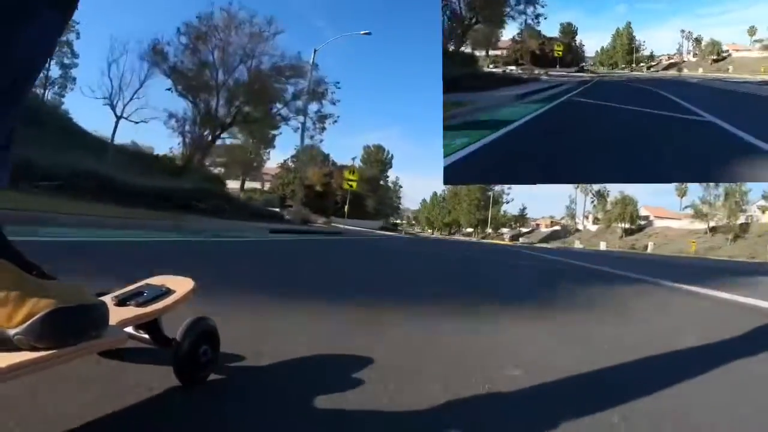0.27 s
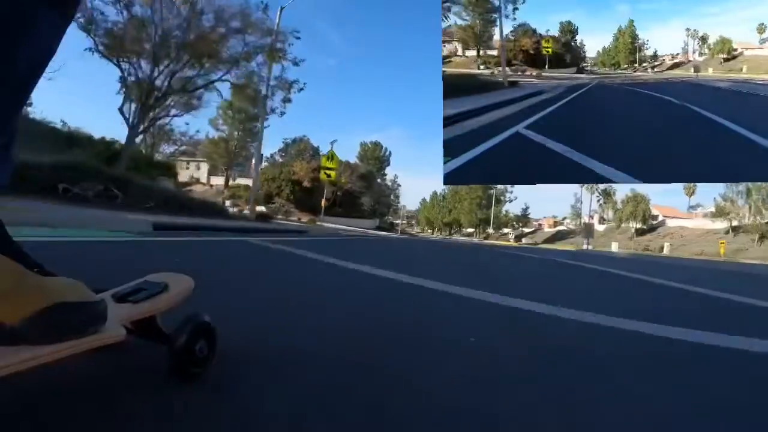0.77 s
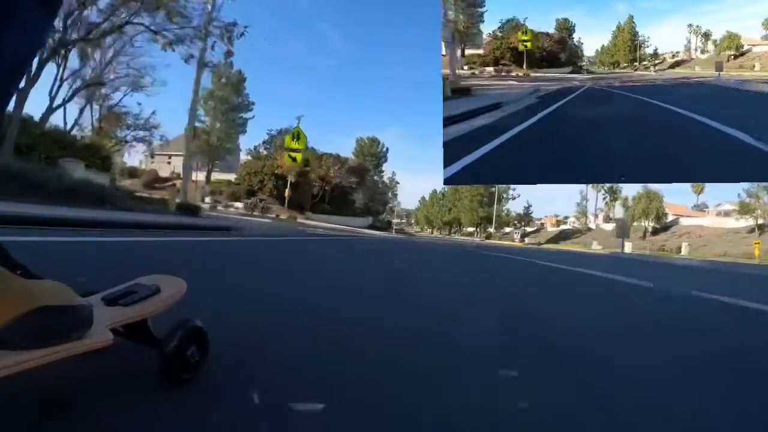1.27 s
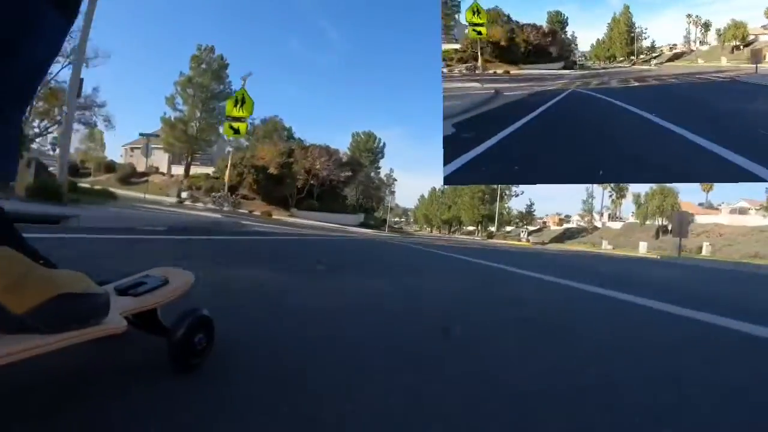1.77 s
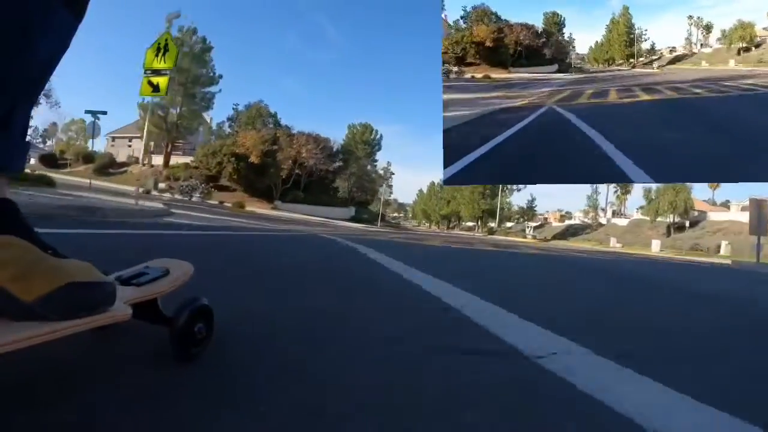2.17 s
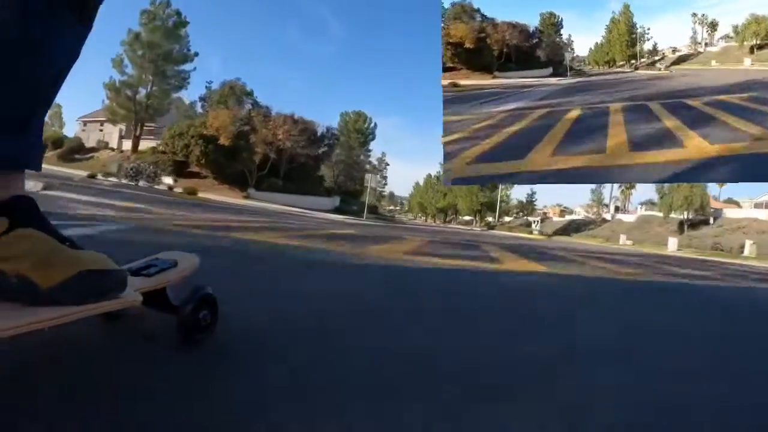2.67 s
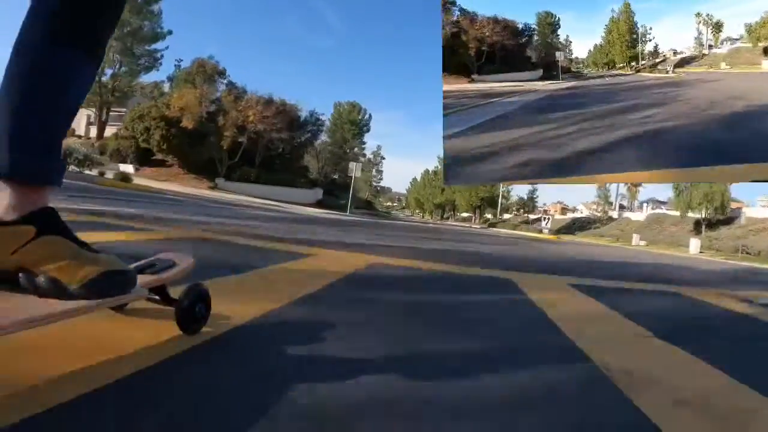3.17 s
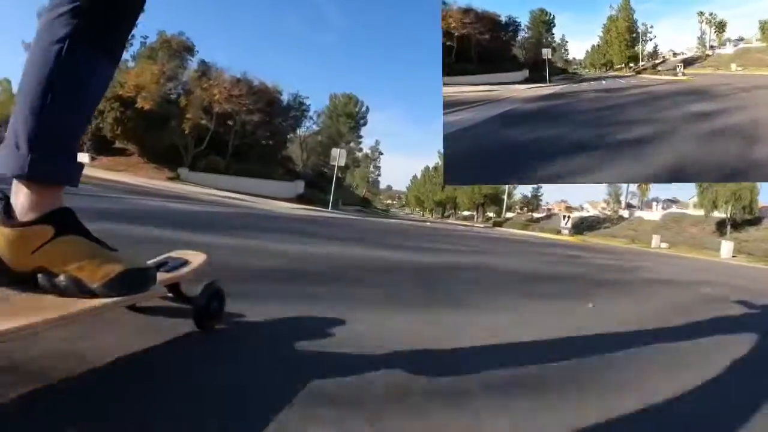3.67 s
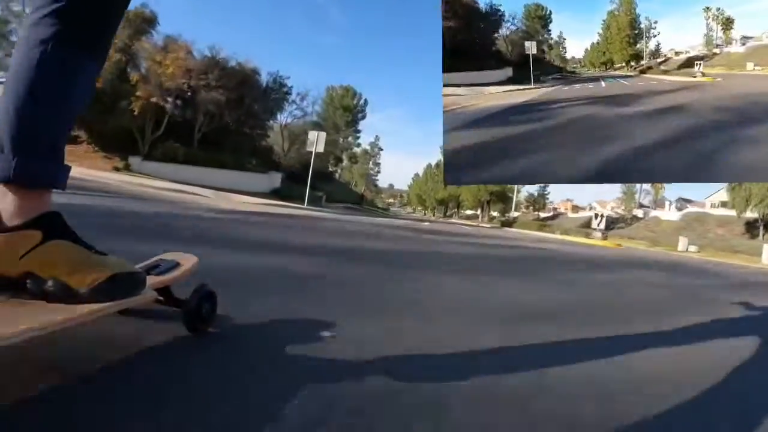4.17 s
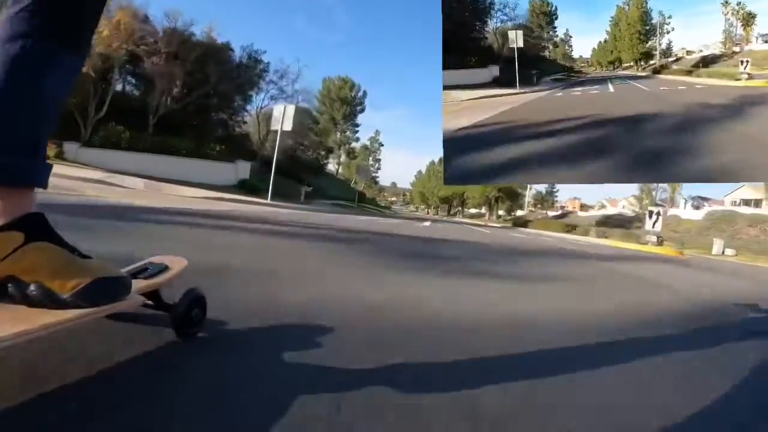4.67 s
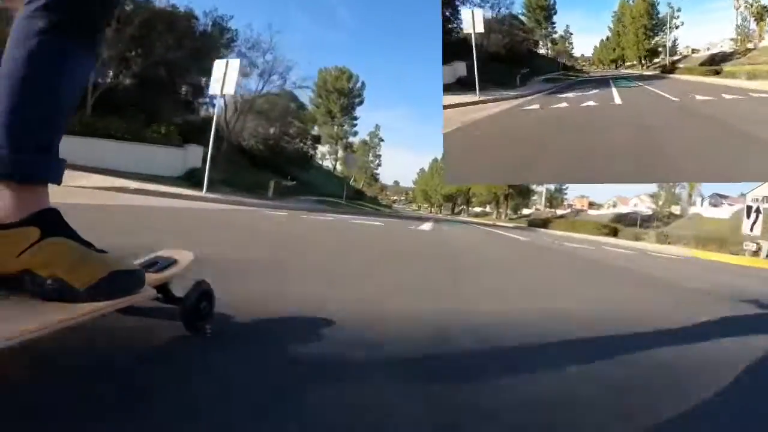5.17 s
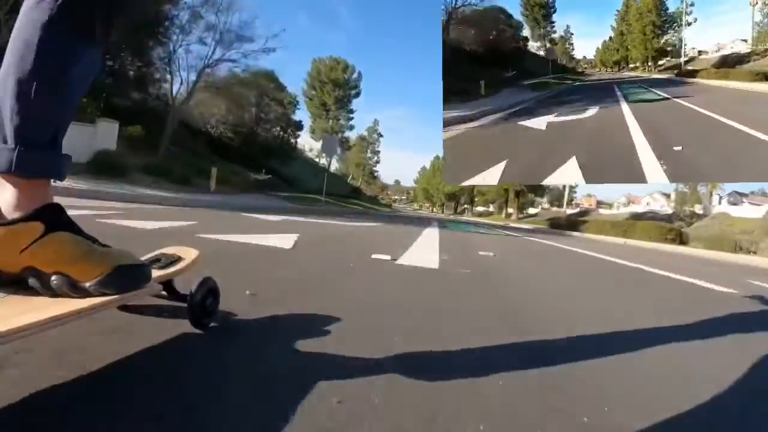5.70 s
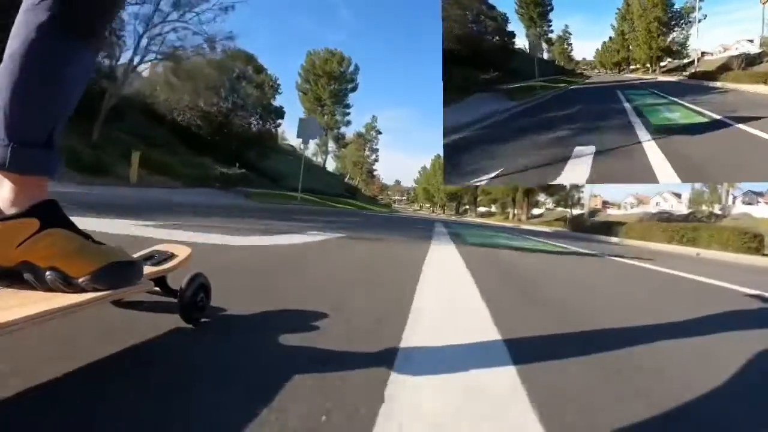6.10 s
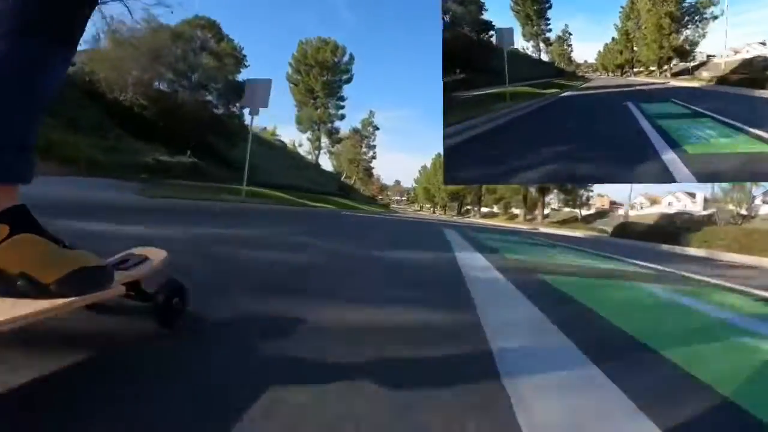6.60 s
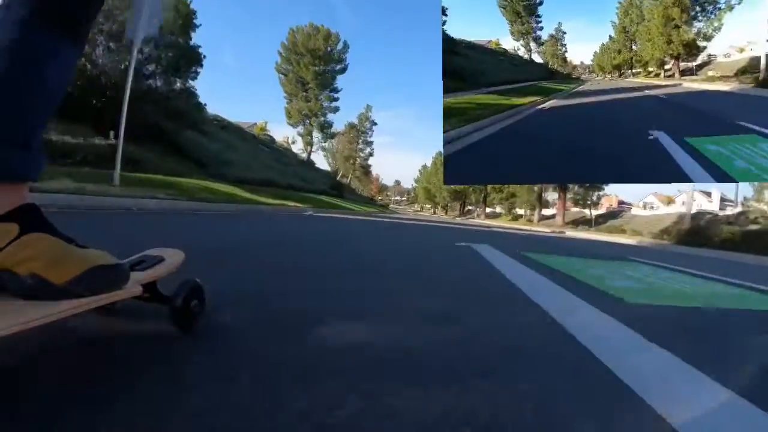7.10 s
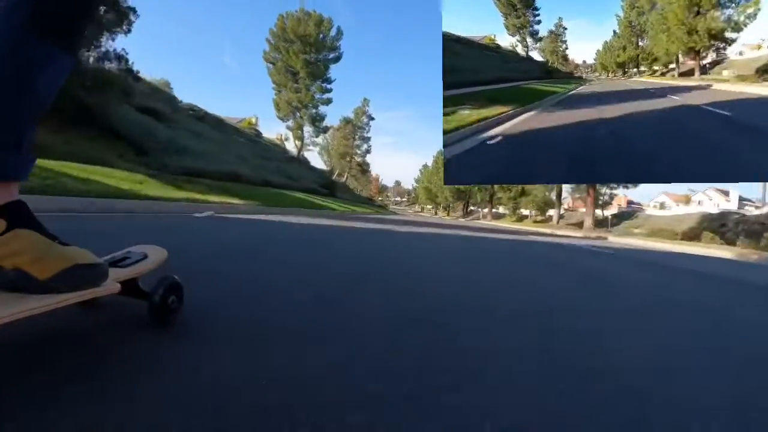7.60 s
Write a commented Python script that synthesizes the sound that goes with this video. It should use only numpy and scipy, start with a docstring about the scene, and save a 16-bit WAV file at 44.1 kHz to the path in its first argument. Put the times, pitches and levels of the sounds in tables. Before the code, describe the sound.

Close beside a fast longboard outdoors: hollow low drumming of the wooden deck, a rough wheel roar and thin bright hiss run without a break. Loose metal trucks chatter and clink, hardest from about three to four seconds, just around a brief hush on smooth road paint. Low wind buffets the small microphone in uneven lumps, and tiny grit ticks crack under the wheels. The treble is somewhat dulled.

```python
"""Fast downhill longboard

A longboard rolls fast downhill, heard by a small microphone beside the deck. Noise and random jolts stand for
asphalt: resonances turn them into drumming wood, roaring wheels and chattering trucks, over a bright hiss.
Damped modes make metal clinks and gritty ticks; low filtered noise makes the wind that buffets the microphone.
A limiter holds the peaks, and smooth road paint hushes the roar for a moment."""
import sys
import numpy as np
from scipy import signal
from scipy.fft import rfft, irfft, next_fast_len
from scipy.io import wavfile
from scipy.ndimage import uniform_filter1d, minimum_filter1d, map_coordinates

SR = 44100
rng = np.random.default_rng(int(sys.argv[2]) if len(sys.argv) > 2 else 0)


def dump(signal):
    """Clip the signal to [-1, 1] and save it as 16-bit WAV at the path in sys.argv[1]."""
    limited = np.clip(np.atleast_2d(signal).T, -1, 1)
    pcm = np.round(limited * 32767).astype(np.int16)
    wavfile.write(sys.argv[1], SR, pcm)


N = 346185


def amp(db):
    """Decibels to gain."""
    return 10 ** (np.asarray(db) / 20)


def unit(x):
    """Scaled to rms 1."""
    return x / np.sqrt(np.mean(x ** 2) + 1e-20)


def curves(rows):
    """One value per sample for each column after the time."""
    s, *columns = np.transpose(rows)
    return [np.interp(np.arange(N) / SR, s, column) for column in columns]


def wobble(rate):
    """A smooth random curve, rate knots a second."""
    knots = rng.standard_normal(int(N * rate / SR) + 4)
    return map_coordinates(knots, [np.arange(N) * rate / SR])


def swells(times, sizes_db, width_s):
    """Bell-shaped changes in dB around the given moments; the largest value counts where they overlap."""
    t = np.arange(0, N / SR, 0.001)
    bells = [db * np.exp(-0.5 * ((t - s) / width_s) ** 2) for s, db in zip(times, sizes_db)]
    return np.interp(np.arange(N) / SR, t, np.max(bells, axis=0))


def filtered(x, response):
    """x shaped by a complex response of frequency."""
    m = next_fast_len(N + SR // 2)
    return irfft(rfft(x, m) * response(np.fft.rfftfreq(m, 1 / SR)), m)[..., :N]


def slope(points):
    """Gain through (Hz, dB) points on a log frequency axis."""
    f, db = np.transpose(points)
    return lambda hz: amp(np.interp(np.log(hz + 1), np.log(f + 1), db))


def below(corner_hz):
    """A steep roll-off over the corner."""
    return lambda f: 1 / (1 + (f / corner_hz) ** 4)


def band(low_hz, high_hz):
    """Steep roll-offs on both sides."""
    return lambda f: below(high_hz)(f) * (1 - below(low_hz)(f))


def body(modes):
    """Causal sum of broad resonances with alternating signs."""
    def response(f):
        total = 0
        for k, (hz, width, db) in enumerate(modes):
            total = total + (-1) ** k * amp(db) * 1j * f * width / (hz * hz - f * f + 1j * f * width)
        return total
    return response


def ring(hz, db, t60, t):
    """One damped mode with a soft start."""
    return amp(db - 60 * t / t60) * np.sin(2 * np.pi * hz * t) * (1 - np.exp(-t / 0.00039))


def patchy(depth_db):
    """White noise whose gain varies in patches of time and frequency."""
    z = signal.stft(rng.standard_normal(N + SR), nperseg=512)[2]
    field = uniform_filter1d(rng.standard_normal(z.shape), size=8, axis=0)
    field = uniform_filter1d(field, size=8, axis=1)
    return signal.istft(z * amp(depth_db * unit(field)), nperseg=512)[1][:N]


def stones(rate, spread_db):
    """Jolts at random moments, most small and a few large; no stone is bigger than the wheel can roll over."""
    chance, size, sign = rng.random(N), rng.exponential(1, N), rng.standard_normal(N)
    largest = 3
    jolts = np.clip(sign, -2, 2) * amp(spread_db * np.minimum(size, largest))
    return unit((chance < rate / SR) * jolts)


# Wind strength over time: start_s, buffet_db
WIND_LEVEL = [(0, -21.5), (0.4, -23), (0.75, -20.5), (1.25, -18), (1.5, -33), (1.8, -29), (2.05, -26),
              (2.7, -19.5), (3.5, -20.5), (3.9, -23.5), (4.3, -17.5), (4.9, -17.5), (5.2, -18),
              (6.1, -18.5), (6.8, -21), (7.85, -21)]
# Deepest buffeting over the rest: start_s, boost_db
WIND_THUD = [(0, 9), (0.4, 0.5), (1.3, -3), (1.6, 10), (1.9, 9), (2.2, 6), (2.75, 0), (3.3, -3.5),
             (4.1, 1.5), (4.5, -1.5), (7.85, 2)]
# Spectrum of the eddies: pitch_hz, gain_db
WIND_COLOUR = [(5, -22.5), (20, -1.5), (60, -3), (120, -5.5), (250, -13.5), (500, -32.5), (1500, -48.5),
               (4000, -99.5)]
THUD_HZ = 45  # the deepest buffeting lies below


def wind():
    """Eddies press on the microphone in lumps; the largest thud at their own pace."""
    buffet_db, = curves(WIND_LEVEL)
    thud_db, = curves(WIND_THUD)
    gusts = amp(0.66 * wobble(7.7))
    eddies = gusts * filtered(patchy(0.18), slope(WIND_COLOUR))
    deep = filtered(eddies, below(THUD_HZ))
    return amp(buffet_db) * (eddies - deep + amp(thud_db) * deep) / eddies.std()


# Grains under the wheels: start_s, level_db, pitch_hz, overtones_db, snap_db (before a common lift)
GRIT_TICKS = [(0.232, -41, 4170, 0, -15), (1.2903, -42, 5460, -4, -12), (1.4674, -31, 4120, -9, -30),
              (1.548, -29, 4646, -7, -32), (3.6714, -34, 3500, -7, -31), (3.7665, -35.5, 6460, -4, -14.5),
              (4.4244, -36, 3940, -5, -27), (4.439, -41, 5053, -6, -30), (4.9, -37, 4940, -12, -32),
              (4.9527, -38, 5000, -11, -30), (4.998, -42, 5080, -15, -26), (5.0344, -42, 5103, -17, -34),
              (6.144, -29.5, 3550, -13, -33), (6.2437, -37, 4070, -13, -26), (7.245, -37, 3985, -9, -27)]


def grit():
    """A grain cracks under a wheel: a short pitched tick with a bright snap; purer ticks ring longer."""
    out, t = np.zeros(N + SR), np.arange(SR // 50) / SR
    for s, db, hz, over_db, snap_db in GRIT_TICKS:
        crumble, crack = rng.standard_normal((2, len(t) + 1))
        snap = amp(snap_db + 16.0 - 60 * t / 0.038) * np.diff(crack)
        tick = ring(hz, 0, 0.0078 * amp(-0.7 * over_db), t)
        tick += ring(1.32 * hz, over_db, 0.016, t) + ring(2.1 * hz, over_db, 0.013, t)
        smooth = uniform_filter1d(uniform_filter1d(crumble[1:], size=20), size=20)
        uneven = 1 + 0.82 * unit(smooth)
        out[round(s * SR):][:len(t)] += amp(db) * (tick * uneven + snap)
    return out[:N]


# Metal knocks: start_s, level_db, bright_modes_db, rattle_db (chatter after it, before looseness scales it)
CLINK_HITS = [(0.232, -30.5, -18, 4.5), (0.484, -33, -23, 3), (1.001, -32, -13, -2), (1.022, -33, -17, 2),
              (1.085, -34, -21, -2), (1.149, -24, -24, 6), (1.19, -28, -18, 0.5), (1.379, -32, -25, 2),
              (1.53, -26, -22, 2), (1.684, -36, -21, 4), (1.712, -30, -22, -3), (1.919, -23, -25, 3),
              (2, -25, -18, 2), (2.035, -27, -25, 4), (2.074, -26, -20, -2), (2.164, -38, -16, 5.5),
              (2.231, -31, -17, 7), (2.337, -31, -18, 4), (2.885, -32.5, -12, 4), (2.9646, -35, -5, 0),
              (2.978, -20, -19, 8), (2.986, -19.5, -23, 7), (3.342, -19.5, -20, 0), (3.444, -26, -10, -7),
              (3.454, -16, -26, -2), (3.5343, -28, -13, -2), (3.572, -32, -9, 3), (3.6802, -14, -24, 7),
              (3.71, -24, -12.5, 11), (3.7985, -16, -27, 4), (3.8452, -22, -27, -1), (3.86, -21, -31, -3),
              (3.881, -28, -24, -3), (3.8917, -22, -32, -2), (3.912, -24, -29, -6), (3.9434, -21, -22, -3),
              (3.987, -23, -24, -1), (4.228, -24.5, -24, -3), (4.325, -25, -16, 3), (4.443, -28, -10, 3),
              (4.5962, -22, -27, -2), (4.766, -33, -14, 3), (4.998, -28, -12, 7), (5.1675, -22, -27, 0),
              (5.283, -26, -28, 5), (5.383, -29, -15, 10), (5.435, -36, -11, -3), (6.08, -23, -26, -4),
              (6.11, -27, -20, 7), (6.178, -20, -23, 8), (6.478, -30, -17, 7), (6.721, -23, -24, 4)]
# Modes of the truck metal, before scatter and looseness: pitch_hz, level_db, t60_s
TRUCK_MODES = [(1268, -3, 0.02), (1640, -14, 0.018), (1920, 0, 0.017), (2570, 10, 0.013), (3130, 9, 0.012),
               (3900, 6, 0.012), (5050, 2, 0.025), (6340, -8, 0.02), (7400, -3, 0.016)]
# Looseness of the washers: start_s, looseness_db
LOOSENESS = [(0, 4.5), (2.4, 5), (2.8, 1), (7.85, 1.5)]
# How the 2nd to 4th truck modes follow the looseness, before each layer's own strength: lean (dB per dB)
MODE_LEANS = (1.5, -1.3, 1.3)
CLINK_LEANS = 2.2  # strength of those leans in the clinks
BRIGHT_HZ = 2300  # truck modes above this are the bright ones
DETUNE = 0.014  # random spread of mode pitch, as a share
CLACK_DB, CLACK_T60_S = 13, 0.012  # broad crack of a knock, over its bright setting
CLACK_LOW_HZ, CLACK_HIGH_HZ = 1300, 3900


def clinks():
    """On a bump washers and hanger knock together; the contact skitters for a few milliseconds."""
    out, cracks, t = np.zeros(N + SR), np.zeros(N + SR), np.arange(SR // 25) / SR
    loose_db, = curves(LOOSENESS)
    for s, db, bright_db, _ in CLINK_HITS:
        start = round(s * SR)
        scatter = rng.standard_normal((len(TRUCK_MODES), 2))
        lean_db = np.zeros(len(TRUCK_MODES))
        lean_db[1:4] = np.array(MODE_LEANS) * CLINK_LEANS * (loose_db[start] - loose_db.min())
        knock = np.zeros(len(t))
        for (hz, level, t60), (detune, uneven), lean in zip(TRUCK_MODES, scatter, lean_db):
            mode_db = level + lean + 0.67 * uneven + bright_db * (hz > BRIGHT_HZ)
            knock += ring(hz * (1 + DETUNE * detune), mode_db, t60, t)
        skitter = amp(-60 * t / 0.014) * rng.standard_normal(len(t))
        rough = np.convolve(knock, skitter)[:len(t)]
        out[start:][:len(t)] += amp(db) * (0.85 * knock + 0.25 * rough / np.abs(rough).max())
        crack_db = db + bright_db + CLACK_DB - 60 * t / CLACK_T60_S
        cracks[start:][:len(t)] += amp(crack_db) * rng.standard_normal(len(t))
    return out[:N] + filtered(cracks[:N], band(CLACK_LOW_HZ, CLACK_HIGH_HZ))


# Spectrum of the rolling hiss: pitch_hz, gain_db
HISS_COLOUR = [(500, -32.5), (1500, 6), (3000, 10.5), (4200, 6.5), (4600, 3), (5100, 4.5), (7600, -1.5),
               (14800, -9.5)]


def road_hiss(coarse):
    """Fine road texture: bright patchy noise with small dense jolts."""
    grain = patchy(0.84) + 0.21 * stones(1400, 2.0)
    return filtered(grain * amp(0.82 * coarse), slope(HISS_COLOUR))


# The 2nd to 4th truck modes in the chatter, before looseness: level_db
CHATTER_MODES = (-4.5, 5.5, -3)
CHATTER_LEANS = 0.65  # strength of the mode leans in the chatter
TAP_BLUR = 3.5  # short taps widen each mode by this factor


def truck_chatter(coarse):
    """Loose metal chatters in sparse, uneven taps that ring three widened truck modes."""
    loose_db, = curves(LOOSENESS)
    taps = (stones(500, 4.2) + 0.92 * patchy(2.1)) * amp(1.6 * coarse)
    chatter = np.zeros(N)
    for k, ((hz, _, t60), db, lean) in enumerate(zip(TRUCK_MODES[1:4], CHATTER_MODES, MODE_LEANS)):
        width_hz = TAP_BLUR * np.log(1000) / np.pi / t60
        resonance = body([(hz, width_hz, 0)])
        rung = filtered(taps, lambda f: resonance(f) ** 2)
        chatter += (-1) ** k * amp(db + CHATTER_LEANS * lean * loose_db) * rung
    return chatter


# Wheel resonances: pitch_hz, width_hz, level_db
WHEEL_MODES = [(676, 180, 4.5), (945, 249, 2), (1235, 241, -1)]


def wheel_roar(texture, coarse):
    """Road texture shakes the wheels, whose broad resonances roar."""
    return filtered(texture * amp(0.96 * coarse), lambda f: body(WHEEL_MODES)(f) * below(2010)(f))


# Upper resonances of the deck: pitch_hz, width_hz, level_db
DECK_UPPER_MODES = [(298, 121, -1.5), (414, 146, -2)]


def upper_drumming(texture, coarse):
    """The upper modes of the wooden deck answer the road texture."""
    return filtered(texture * amp(0.87 * coarse), lambda f: body(DECK_UPPER_MODES)(f) * below(605)(f))


# Low resonances of the deck, before the stance shifts them: pitch_hz, width_hz, level_db
DECK_MODES = [(152, 34, -2), (202.3, 24.8, -0.5), (251.6, 31.7, -3.5)]
# Rider's shifting weight: start_s, lowest_mode_db and highest_mode_db (relative to the middle), highest_mode_hz
RIDER_STANCE = [(0, -8, -1, 248.1), (0.4, -3.5, -3, 249.6), (1.2, -2.5, -2, 237.6), (1.7, 2, -0.5, 256.5),
                (2.2, -5, -0.5, 292.3), (2.75, -5, 2.5, 259.3), (3.4, 4, 7, 248.9), (3.9, 2.5, 8.5, 239.3),
                (4.3, -2, 3.5, 261.8), (4.8, 0, 4.5, 260.5), (5.6, -3.5, 5, 257), (6.3, -3.5, -2.5, 250.3),
                (7.2, -4.5, 1.5, 275), (7.85, 0.5, 1, 280)]


def low_drumming(texture):
    """The deck drums; the rider's shifting weight favours one mode or another and bends the highest."""
    lowest_db, highest_db, highest_hz = curves(RIDER_STANCE)
    modes = []
    for k, (mode, db) in enumerate(zip(DECK_MODES, (lowest_db, 0, highest_db))):
        modes.append((-1) ** k * amp(db) * filtered(texture, body([mode])))
    # shift every frequency of the highest mode by the same moving amount
    bend = np.exp(2j * np.pi * np.cumsum(highest_hz - DECK_MODES[-1][0]) / SR)
    modes[-1] = (signal.hilbert(modes[-1], next_fast_len(N))[:N] * bend).real
    return filtered(sum(modes), band(114, 292))


PAINT_FROM_S, PAINT_TO_S = 3.12, 3.46
PAINT_ON_S, PAINT_OFF_S = 0.03, 0.055  # softness of the two edges
TRUCK_CALMS_S = 3.02  # the front truck reaches the paint first and chatters less


def paint(from_s):
    """1 while the wheels run on smooth paint, 0 on asphalt; they leave it more gradually than they reach it."""
    t = np.arange(N) / SR
    return (np.tanh((t - from_s) / PAINT_ON_S) - np.tanh((t - PAINT_TO_S) / PAINT_OFF_S)) / 2


# Rolling levels before paint and coarse spots: start_s, drumming_db, roar_db, hiss_db
ROLL_LEVEL = [(0, -20, -31, -47), (0.45, -17, -33.5, -46), (1.1, -16.5, -29.5, -45), (1.5, -18, -32.5, -44),
              (2.0, -15, -33, -43.5), (2.25, -15, -30.5, -46), (2.7, -20.5, -32.5, -45.5),
              (3.1, -23.5, -34, -46.5), (3.24, -32.5, -31.5, -46), (3.45, -24.5, -34, -43.5),
              (3.8, -20.5, -30, -43), (4.25, -21, -31.5, -43.5), (4.7, -22, -31.5, -46),
              (5.5, -23, -30.5, -46.5), (6.2, -25.5, -32.5, -46.5), (6.8, -22, -32, -45),
              (7.35, -19, -31.5, -45), (7.85, -24, -29.5, -45)]
# Coarse spots in the asphalt: start_s (centre), swell_db (of the roar)
COARSE_SPOTS = [(0.033, 3.5), (0.235, 1.5), (2.8, 3), (3.077, 6.5), (3.338, 11.5), (3.445, 8.5), (3.488, 1),
                (3.584, 5.5), (3.739, 4), (4.444, 6.5), (4.478, 5), (4.857, 1.5), (5.4, 0), (5.438, 6),
                (5.522, 6), (5.739, 5), (5.908, 4), (6.004, 8), (6.212, 0), (6.478, 2), (7.638, 1.5),
                (7.703, 0)]
# Level change on paint: drumming_db, roar_db, chatter_db, hiss_db
PAINT_CHANGE = (1.5, -10, -12, -3)
SPOT_S, SHAKE_S = 0.012, 0.014  # bell widths of a coarse spot and of the rattle that a clink sets off
DRUM_SWELL = 0.42  # share of a coarse spot's swell that reaches the low drumming
UPPER_DB, UPPER_FROM_ROAR, UPPER_SWELL = -24.5, 0.66, 1  # upper deck follows both drumming and roar
CHATTER_DB, CHATTER_FROM_HISS, CHATTER_SWELL = -46, 0.63, 0.66  # chatter grows with the hiss
LOOSE_RATTLE = 0.058  # looser washers rattle harder after a clink (share per dB)


def levels():
    """Levels in dB of low and upper drumming, roar, chatter and hiss, from the surface under the wheels."""
    drum, roar, hiss = curves(ROLL_LEVEL)
    loose_db, = curves(LOOSENESS)
    spots = swells(*np.transpose(COARSE_SPOTS), SPOT_S)
    clink_s, _, _, rattle_db = np.transpose(CLINK_HITS)
    shake = swells(clink_s + SHAKE_S / 2, rattle_db, SHAKE_S) * (1 + LOOSE_RATTLE * loose_db)
    drum_paint, roar_paint, chatter_paint, hiss_paint = PAINT_CHANGE

    chatter = CHATTER_DB + CHATTER_FROM_HISS * (hiss - hiss.mean()) + CHATTER_SWELL * spots
    chatter += shake + chatter_paint * paint(TRUCK_CALMS_S)

    painted = paint(PAINT_FROM_S)
    drum = drum + drum_paint * painted
    roar = roar + roar_paint * painted
    hiss = hiss + hiss_paint * painted

    upper = UPPER_DB + (1 - UPPER_FROM_ROAR) * (drum - drum.mean())
    upper += UPPER_FROM_ROAR * (roar - roar.mean()) + UPPER_SWELL * spots
    return drum + DRUM_SWELL * spots, upper, roar + spots + 0.2 * shake, chatter, hiss + 0.33 * shake


def rolling():
    """Road texture shakes wheels, deck and trucks; coarse and fine stretches pass many times a second."""
    coarse = 0.6 * wobble(25) + 1.0 * wobble(70)
    texture = patchy(1.0) + 0.48 * stones(900, 3.0)
    layers = (low_drumming(texture), upper_drumming(texture, coarse), wheel_roar(texture, coarse),
              truck_chatter(coarse), road_hiss(coarse))
    return sum(amp(db) * unit(layer) for db, layer in zip(levels(), layers))


def scene():
    """Everything reaches one microphone."""
    return (wind() + grit() + clinks() + rolling())[None]


# Treble response of the microphone in its housing: pitch_hz, gain_db
MICROPHONE_TREBLE = [(7400, -0.5), (8200, -5.5), (9100, -4.5), (10200, -12), (12500, -16.5), (14900, -55)]
TOP_HZ = 14900  # band limit


def record(dry):
    """A limiter holds the loudest swings down; the housing dulls the treble, and a band limit cuts the top."""
    ceiling = 0.5
    needed = np.minimum(1, ceiling / (np.abs(dry) + 1e-9))
    gain = uniform_filter1d(minimum_filter1d(needed, size=441), size=221)
    return filtered(dry * gain, lambda hz: slope(MICROPHONE_TREBLE)(hz) * (hz < TOP_HZ))


dry = scene()
out = record(dry)
dump(out)
```